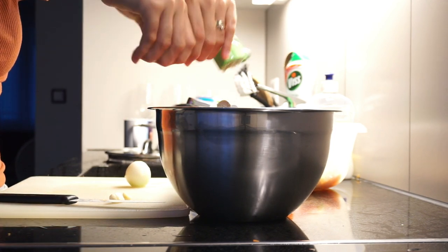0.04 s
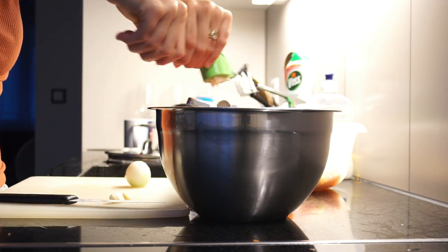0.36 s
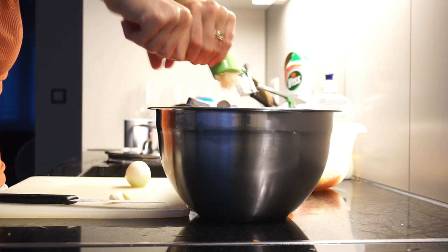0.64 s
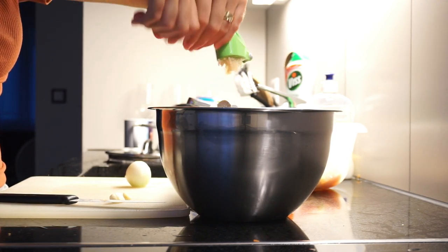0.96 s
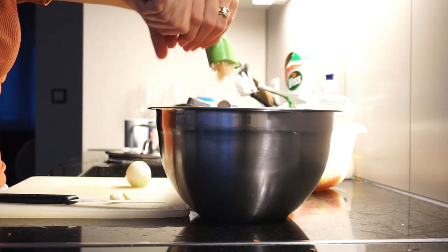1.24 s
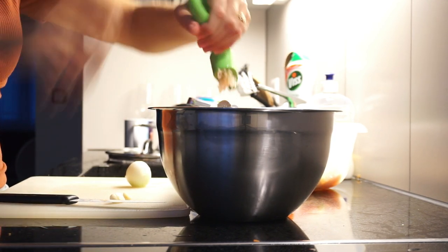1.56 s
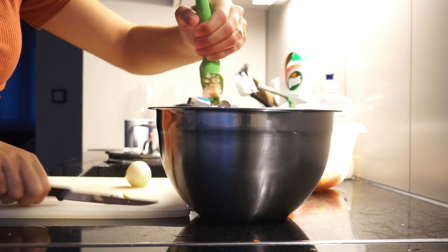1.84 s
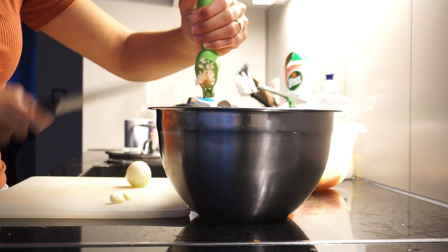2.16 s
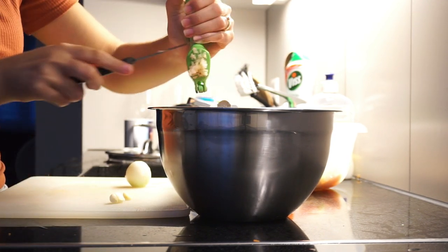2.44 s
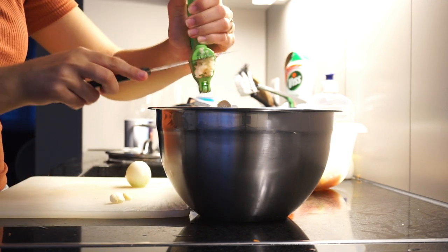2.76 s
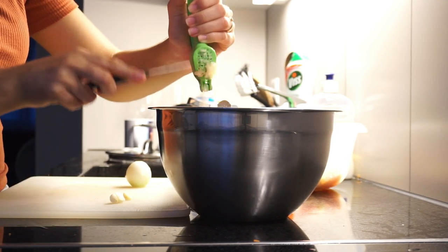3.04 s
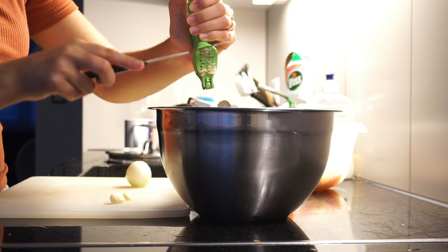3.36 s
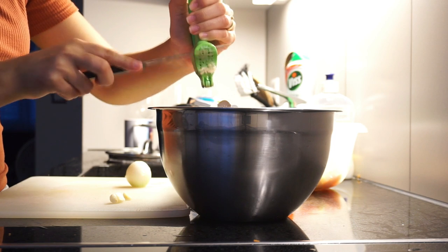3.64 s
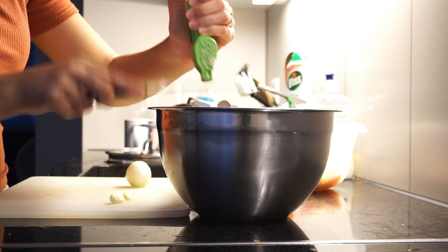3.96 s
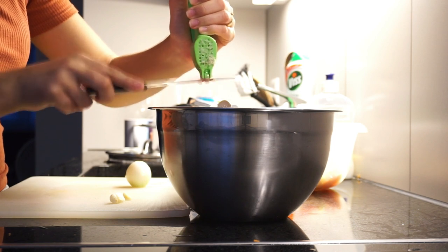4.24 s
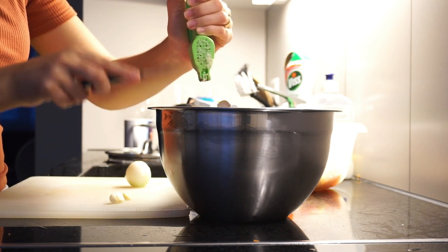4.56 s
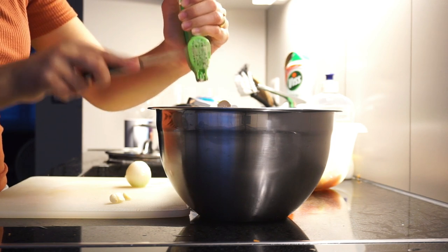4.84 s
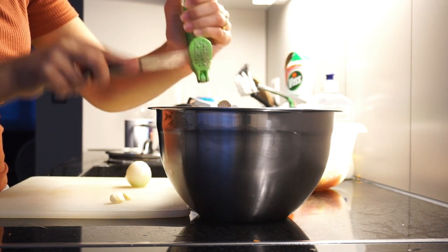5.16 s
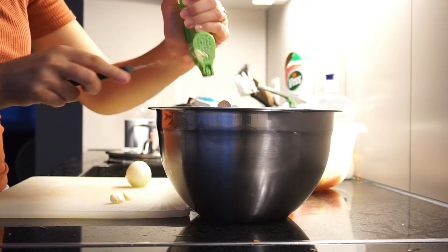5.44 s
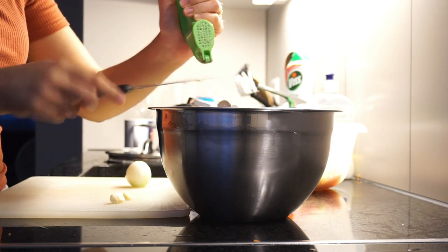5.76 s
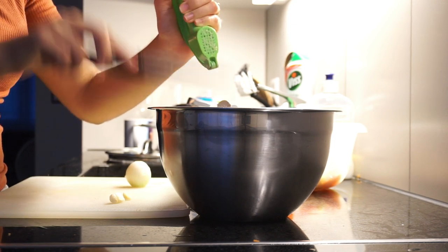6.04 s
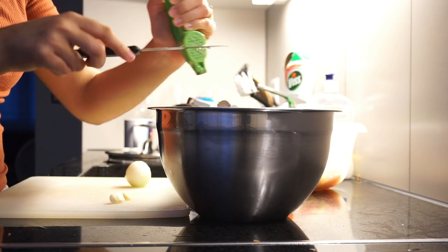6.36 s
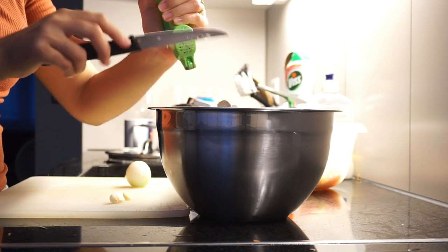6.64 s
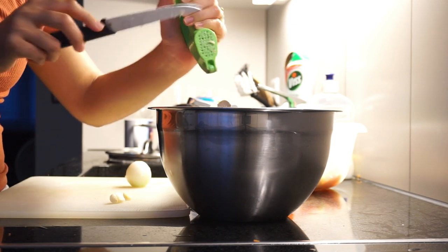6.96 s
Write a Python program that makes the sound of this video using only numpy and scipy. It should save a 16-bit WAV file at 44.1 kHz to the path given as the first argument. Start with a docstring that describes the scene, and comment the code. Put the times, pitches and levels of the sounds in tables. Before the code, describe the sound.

In a softly hissing kitchen, a garlic press gives a brief wet crackle close to the microphone. An arm rustles faintly and a knife is picked up from a board with small knocks. The blade scrapes the press in uneven, bright clicks and duller plastic clacks, with one faint low rumble among them. Then a steel bowl is struck and rings, and the blade squeaks thinly, clicks and scrapes once more.

```python
"""First comes a wet crackle: garlic spits through the holes of a hand press over a steel bowl in a kitchen.
An arm rustles, and a knife knocks on the board as it is picked up. Its edge clicks and scrapes over the
press, making the blade and the press's plastic body ring briefly. After a short low rumble, the knife hits
the bowl once; the long ring throbs because the steel's tones come in close pairs. Last, the blade sticks
and slips on the press with a thin squeak. A soft hiss lies under it all."""
import sys
import numpy as np
from scipy import signal
from scipy.fft import rfft, irfft
from scipy.io import wavfile
from scipy.ndimage import uniform_filter1d

SR = 44100
rng = np.random.default_rng(int(sys.argv[2]) if len(sys.argv) > 2 else 0)


def materialize(psi):
    """Save the field psi as 16-bit PCM at rate SR to the path in sys.argv[1].

    A 1-D psi becomes a single channel; in a 2-D psi each row is a channel.
    """
    bounded = np.clip(np.atleast_2d(psi).T, -1, 1)
    quanta = np.round(bounded * 32767).astype(np.int16)
    wavfile.write(sys.argv[1], SR, quanta)


N = 317961
TIME = np.arange(N) / SR

# The kitchen's echo. Each row: frequency in Hz, seconds to fade by 60 dB.
ECHO_FADES = [(200, 0.24), (1500, 0.95), (5000, 0.59), (11000, 0.42)]
# The tone of the room's noise. Each row: frequency in Hz, level in dB.
HISS_SPECTRUM = [(15, -74), (25, -56), (64, -54), (87, -10.5), (118, -16), (134, -8.5), (191, -2.5),
                 (229, -7), (491, -1.5), (617, -4.5), (928, -3), (1940, -6), (2840, -10.5), (3310, -10),
                 (11000, -14), (14200, -108), (22000, -120)]
# How alike that noise is left and right. Each row: frequency in Hz, likeness from -1 (opposite) to 1 (same).
HISS_LIKENESS = [(60, 0.64), (140, 0.9), (340, 0.000083), (790, -0.52), (1880, -0.41), (4440, -0.15),
                 (10500, 0.078)]
# Squeezes. Each row: peak time in seconds, level in dB, fall in seconds, the press's ring in relative dB.
GARLIC_SQUEEZES = [(.19, -41, 0.014, -19), (.243, -27, 0.021, -22), (.375, -43, .015, -25),
                   (.461, -25.5, 0.016, -16), (0.678, -27.5, .0075, -6.5)]
# Air pockets bursting through the holes. Each row: peak time in seconds, level in dB.
AIR_POPS = [(0.2173, -22), (0.4864, -25)]
# The tone of the spitting pulp. Each row: frequency in Hz, level in dB.
PULP_SPECTRUM = [(180, -58), (300, -21), (464, -18), (609, -26), (1220, -14), (1750, -21), (2510, -11),
                 (4180, -6), (4510, -4.5), (5480, -2.5), (7980, -3.5), (8870, 0), (11000, -0.5),
                 (14200, -33), (22000, -120)]
# Arm movements. Each row: peak time in seconds, level in dB, rise and fall time in seconds.
ARM_RUSTLES = [(1.45, -55.5, 0.058), (2.42, -58.5, 0.18), (5.78, -50, 0.087)]
# The tone of the rustle. Each row: frequency in Hz, level in dB.
RUSTLE_SPECTRUM = [(200, -1), (600, 14), (1300, 18.5), (2500, -1), (5000, -53), (11000, -57)]
# The knife knocking on the board. Each row: peak time in seconds, level in dB.
KNIFE_KNOCKS = [(1.733, -43.5), (1.807, -45), (1.839, -37), (1.863, -30), (1.883, -31), (1.899, -27),
                (1.933, -36.5)]
# The tone of the board. Each row: frequency in Hz, level in dB.
BOARD_SPECTRUM = [(300, -9), (700, -19), (980, 1), (1250, -10), (1600, -4.5), (2400, 0), (3100, -8.5),
                  (3900, -5.5), (6600, -14), (7500, -20), (11000, -25)]
# Sharp clicks of the blade. Each row: start in seconds, level in dB, drag in relative dB, ping pitch in Hz.
BLADE_CLICKS = [(2.687, -38.5, -14, 5300), (2.9186, -29.5, -12.5, 4780), (3.1701, -32, -7.5, 5310),
                (3.4311, -28, -4.5, 5390), (3.469, -23, -7.5, 5435), (3.687, -9, -19, 5450),
                (3.9314, -8, -23.5, 5410), (4.4147, -8, -25, 5540), (4.7466, -34.5, -13, 5340),
                (4.9306, -10.5, -14.5, 5460), (5.1811, -8, -19.5, 5520), (7.1316, -16, -4, 6950)]
# Duller drops onto the plastic body. Each row: start in seconds, level in dB, the drag's fall in seconds.
BODY_CLACKS = [(2.968, -33, 0.0086), (3.198, -37.5, 0.015), (3.9861, -18.5, 0.01), (4.2419, -19, 0.011),
               (4.4553, -29, 0.011), (4.4779, -26, 0.02), (4.7744, -43, .008), (4.9844, -20.5, 0.032),
               (5.215, -23.5, 0.042)]
# Resonances of the blade held on the press. Each row: frequency in Hz, width in Hz, level in dB.
PRESS_RESONANCES = [(1275, 92, -30), (2540, 550, -22), (3245, 150, -20.5), (3695, 360, -12),
                    (4680, 140, -27), (5290, 970, -4.5), (6190, 200, -11.5), (7260, 1800, -20.5),
                    (8300, 580, -8), (10300, 340, -24)]
# A hollow note that rises and weakens as the held length of the blade changes. Each row: time in seconds, pitch
# in Hz, level in dB.
HOLLOW_NOTE = [(3.2, 1566, -12.5), (3.47, 1640, -15), (3.69, 1880, -22.5), (5.2, 2004, -21)]
# The blade sliding. Each row: peak time in seconds, level in dB, rise in seconds, fall in seconds.
BLADE_SLIDES = [(2.963, -39.5, .012, 0.0068), (4.742, -46, .012, 0.018), (6.868, -45, 0.038, .018),
                (6.912, -38, .016, .012), (7.19, -34.5, 0.022, 0.057)]
# The tone of the sliding. Each row: frequency in Hz, level in dB.
SLIDE_SPECTRUM = [(590, -59), (1000, -50), (1420, -44), (1770, -17), (2160, -16), (2440, -9.5), (3530, -10),
                  (6000, -4.5), (11000, -8.5), (14200, -41), (22000, -120)]
# How the rumble's loudness moves. Each row: time in seconds, level in dB.
RUMBLE_LEVELS = [(4.26, -56), (4.282, -47), (4.306, -41), (4.416, -46.5), (4.43, -48)]
# The tone of the rumble. Each row: frequency in Hz, level in dB.
RUMBLE_SPECTRUM = [(40, -35), (90, -7), (140, 7.5), (260, 2.5), (500, 6), (700, -9), (1200, -49),
                   (4000, -68)]
# The tone of the bowl's clatter. Each row: frequency in Hz, level in dB.
BOWL_SPECTRUM = [(170, -20), (300, -19.5), (470, -7.5), (800, -2.5), (1600, -10), (2300, 0), (3100, -9.5),
                 (3550, -5), (3800, -22), (4200, -19), (4900, -4.5), (6200, -6.5), (6900, -9.5),
                 (11000, -19.5)]
# The steel's pairs of tones. Each row: pitch in Hz, level in dB, seconds to fade by 60 dB, gap to twin in Hz.
STEEL_TONES = [(1925, -29, .4, 14), (2130, -29, .45, 8), (2182, -26, .55, 9), (2248, -25, 1.0, 1.2),
               (2452, -28, .62, 6), (2828, -21, .5, 19), (3451, -24.5, .58, 16), (3550, -29, .5, 9),
               (4422, -18.5, 1.05, 1.3), (4747, -27, .8, 4), (4896, -17, 1.2, 3.15), (5053, -20, .52, 7),
               (5322, -23, .85, 2.5), (5724, -15, .43, 9), (6086, -20, .56, 4), (6446, -31, .4, 9),
               (6806, -36, .6, 6), (7168, -35, .45, 8), (7533, -26.5, .42, 5), (7831, -39, .55, 7),
               (9272, -40, .45, 10)]
# The squeak's short chirps. Each row: peak time in seconds, pitch in Hz, level in dB,
# half length in seconds, glide in Hz per second.
SQUEAK_CHIRPS = [(6.846, 8620, -32, .011, -1500), (6.84, 5090, -45, 0.013, 9001),
                 (6.858, 4300, -52, 0.013, -3000), (6.877, 9050, -41, .008, 8001),
                 (6.88, 5630, -46, 0.024, 5000.5), (6.891, 7800, -39, .009, -18000),
                 (6.906, 4650, -46, .011, -10000), (6.918, 5950, -46, 0.013, 1998.5)]


def from_db(db):
    """Turn decibels into a number to multiply by."""
    return 10 ** (np.asarray(db) / 20)


def rms_one(x):
    """Scale a signal so its average strength (rms) is 1."""
    return x / np.sqrt(np.mean(x ** 2) + 1e-20)


def at_hz(points, hz):
    """Read between a table's rows, with octaves evenly spaced."""
    f, value = np.transpose(points)
    return np.interp(np.log(np.maximum(hz, 1)), np.log(f), value)


def colour(x, spectrum, top_hz=11600):
    """Give a signal the tone in a table, falling away below the first row; strength 1."""
    hz = np.arange(N // 2 + 1) * SR / N
    ends = np.minimum(hz / spectrum[0][0], 1) ** 2 * (hz < top_hz)
    return rms_one(irfft(rfft(x) * from_db(at_hz(spectrum, hz)) * ends, N))


def resonate(x, hz, width):
    """Make a signal ring near one pitch, longer when the width is narrow; strength 1."""
    r = np.exp(-np.pi * width / SR)
    return rms_one(signal.lfilter([1, 0, -1], [1, -2 * r * np.cos(2 * np.pi * hz / SR), r * r], x))


def cut_bass(x, hz, order=3):
    """Weaken everything below a frequency."""
    return signal.sosfilt(signal.butter(order, hz, "high", fs=SR, output="sos"), x)


def grains(per_s, spread_db, size=N):
    """Tiny clicks of uneven size at random moments; strength 1."""
    sizes = from_db(spread_db * np.minimum(rng.exponential(1, size), 4))
    return rms_one(sizes * rng.choice([-1, 1], size) * (rng.random(size) < per_s / SR))


def swells(rows):
    """A loudness curve that rises to a peak and falls again for each row."""
    power = np.zeros(N)
    for s, db, rise, fall in rows:
        fade = np.maximum((s - TIME) / rise, (TIME - s) / fall)
        power += from_db(db) ** 2 * np.exp(-2 * np.minimum(fade, 20))
    return np.sqrt(power)


def strokes(rows, spectrum, per_s, spread_db):
    """Many tiny contacts swell and fade, taking on the tone of the thing they touch."""
    sound = swells(rows) * colour(grains(per_s, spread_db), spectrum)
    return cut_bass(sound, 1.5 * spectrum[0][0])


def place(x, left_db):
    """Make a sound louder on the left; the right side leads by two samples."""
    return np.array([np.roll(x, 2) * from_db(left_db / 2), x * from_db(-left_db / 2)])


def kitchen(x, left_db, early_db, tail_db, early_s, lean=0.75):
    """The direct sound, quick echoes from counter, wall and cupboards, then the room's fading tail."""
    t = np.arange(SR) / SR
    edges = np.geomspace(100, 12800, 8)
    tail = 0
    for low, high in zip(edges, edges[1:]):
        band_filter = signal.butter(2, [low, high], "band", fs=SR, output="sos")
        band = signal.sosfilt(band_filter, rng.standard_normal((2, SR)))
        tail = tail + band * from_db(-60 * t / at_hz(ECHO_FADES, np.sqrt(low * high)))
    tail = from_db(tail_db) * rms_one(tail * (t > .008))
    early = rng.standard_normal((2, SR)) * (rng.random((2, SR)) < .1) * np.exp(-t / early_s)
    early = from_db(early_db) * rms_one(early * (t > .002))
    echoes = signal.fftconvolve(x[None], (early + tail) / np.sqrt(SR), axes=1)[:, :N]
    # the echoes lean to the source's side, less than the direct sound
    return place(x, left_db) + echoes * from_db(np.array([[1], [-1]]) * lean * left_db / 2)


def background():
    """Steady room noise and hiss, alike on both sides only in the bass."""
    hz = np.arange(N // 2 + 1) * SR / N
    alike = np.clip(at_hz(HISS_LIKENESS, hz), -.99, .99)
    mid, side = (rfft(colour(rng.standard_normal(N), HISS_SPECTRUM)) for _ in range(2))
    side = side * np.sqrt((1 - alike) / (1 + alike))
    return from_db(-52) * irfft([mid + side, mid - side], N) * from_db([[0.92], [-0.92]])


def pulp(rise_s=0.02, pop_rise_s=0.0013, pop_fall_s=0.0059):
    """Juice and air crackle through the holes; the press rings along, more freely as it empties."""
    crackle = grains(per_s=5000, spread_db=4.0)
    flow = swells([(s, db, rise_s, fall) for s, db, fall, _ in GARLIC_SQUEEZES])
    ringing = swells([(s, db + ring_db, rise_s, fall) for s, db, fall, ring_db in GARLIC_SQUEEZES])
    pops = swells([(s, db, pop_rise_s, pop_fall_s) for s, db in AIR_POPS])
    ring = ringing * resonate(crackle, hz=5340, width=410)
    knock = pops * from_db(-8) * resonate(crackle, hz=3470, width=2700)  # each pop knocks the plastic body
    return np.hypot(flow, pops) * colour(crackle, PULP_SPECTRUM) + ring + knock


def arm_rustle():
    """The moving arm rustles softly."""
    moves = [(s, db, length, length) for s, db, length in ARM_RUSTLES]
    return strokes(moves, RUSTLE_SPECTRUM, per_s=4000, spread_db=3.5)


def board_knocks(rise_s=0.002, fall_s=0.01):
    """The knife knocks on the board as it is picked up."""
    knocks = [(s, db, rise_s, fall_s) for s, db in KNIFE_KNOCKS]
    return strokes(knocks, BOARD_SPECTRUM, per_s=3500, spread_db=4.0)


def blade_contacts(mid_blade_hz=5435, firm_db=-10):
    """List the clicks, then the clacks, with the settings that blade_catches needs for each."""
    rows = []
    for s, db, drag_db, ping_hz in BLADE_CLICKS:
        # a lighter click has more plastic body in it; nearer the tip the ping is higher, the body weaker
        body_db = -4 + 0.45 * (firm_db - db) - 0.0092 * (ping_hz - mid_blade_hz)
        top_db, fall, ping_db = -6, 0.025, -2
        rows.append((s, db, body_db, top_db, drag_db, fall, ping_hz, ping_db))
    body_db, top_db, drag_db, ping_hz, ping_db = 8, -3.5, -6.5, 3580, -7
    for s, db, fall in BODY_CLACKS:
        rows.append((s, db, body_db, top_db, drag_db, fall, ping_hz, ping_db))
    return rows


def blade_catches(snap_s=0.0012, crack_db=-17, ping_width_hz=300, shift=0.0064, size=8192):
    """The edge snaps over a ridge, then drags on; gives the press's clacks and the blade's pings."""
    clacks, pings = np.zeros((2, N + size))
    t = np.arange(size) / SR
    snap = t / snap_s * np.exp(1 - t / snap_s) * np.exp(-(t / (2 * snap_s)) ** 2)
    # the ping builds up during the snap and dies just after it
    ping_shape = signal.lfilter([1], [1, -np.exp(-np.pi * ping_width_hz / SR)], snap)
    hollow_s, hollow_hz, hollow_db = np.transpose(HOLLOW_NOTE)
    for s, db, body_db, top_db, drag_db, fall, ping_hz, ping_db in blade_contacts():
        force = snap + from_db(drag_db) * np.exp(-t / fall)
        contact = force * grains(per_s=12000, spread_db=0.66, size=size)
        clack = from_db(crack_db) * rms_one(contact)
        hollow = resonate(contact, np.interp(s, hollow_s, hollow_hz), width=100)
        hollow *= from_db(np.interp(s, hollow_s, hollow_db) + body_db)
        for hz, width, tone_db in PRESS_RESONANCES:
            # the spot touched shifts each pitch a little and favours the plastic body or the thin edge
            shifted_hz = hz * (1 + shift * rng.uniform(-1.2, 1))
            contact_db = at_hz([(3700, body_db), (5000, 0), (6300, 0), (8500, top_db)], hz)
            clack += from_db(tone_db + contact_db) * resonate(contact, shifted_hz, width)
        ping = from_db(ping_db) * rms_one(ping_shape * np.sin(2 * np.pi * ping_hz * t))
        start = int(s * SR)
        strength = from_db(db) * np.sqrt(np.mean(force ** 2))
        clacks[start:start + size] += strength * clack
        pings[start:start + size] += strength * (hollow + ping)
    return cut_bass([clacks[:N], pings[:N]], hz=900)  # such small things give off no bass


def blade_slides():
    """The blade scrapes along the press in short strokes."""
    return strokes(BLADE_SLIDES, SLIDE_SPECTRUM, per_s=7000, spread_db=2.5)


def rumble():
    """A brief swell of low noise."""
    level_db = np.interp(TIME, *np.transpose(RUMBLE_LEVELS), left=-np.inf, right=-np.inf)
    return from_db(level_db) * colour(rng.standard_normal(N), RUMBLE_SPECTRUM)


def bowl_clatter(strike_s, rise_s=0.00056):
    """The knife hits the bowl; the contents rattle and settle."""
    blow = (strike_s, -10.5, rise_s, .012)  # peak time in seconds, level in dB, rise and fall in seconds
    rattle = (strike_s + 0.071, -23, 0.023, 0.062)
    clatter = strokes([blow, rattle], BOWL_SPECTRUM, per_s=13000, spread_db=2.0)
    return clatter * (TIME > strike_s - 2 * rise_s)


def steel_ring(strike_s, left_db=1.5, right_db=-4.5, contact_s=0.0017):
    """Each tone builds up during the hit and throbs against its twin, out of step left and right."""
    start = int(strike_s * SR)
    t, out = TIME[:N - start], np.zeros((2, N))
    for hz, db, fade_s, gap_hz in STEEL_TONES:
        phase = 2 * np.pi * (hz * t + rng.random())
        twin = phase + 2 * np.pi * gap_hz * t
        fade = from_db(db - 60 * t / fade_s) * (1 - np.exp(-t / contact_s))
        out[0, start:] += from_db(left_db) * fade * (np.sin(phase) - np.sin(twin))
        out[1, start:] += from_db(right_db) * fade * (np.sin(phase) + 0.76 * np.cos(twin))
    return out


def squeak(waver_hz=110, rough=0.31):
    """The edge sticks and slips, making thin gliding tones that waver in pitch and strength."""
    out = np.zeros(N)
    for s, hz, db, length, glide in SQUEAK_CHIRPS:
        waver, grip = (rms_one(uniform_filter1d(rng.standard_normal(N), size=90)) for _ in range(2))
        pitch = hz + glide * (TIME - s) + waver_hz * waver
        swell = from_db(db) * np.exp(-np.minimum(((TIME - s) / length) ** 2 / 2, 20))
        out += swell * rms_one((1 + rough * grip) * np.sin(2 * np.pi * np.cumsum(pitch) / SR))
    return out


def scene(strike_s=6.021):
    """Place all the sounds in the kitchen and add them up."""
    slides = blade_slides()
    handling = board_knocks() + bowl_clatter(strike_s) + arm_rustle()
    low = place(rumble(), left_db=4.0)
    ring = steel_ring(strike_s)
    clacks, pings = blade_catches()
    press = kitchen(clacks, left_db=6.5, early_db=-0.5, tail_db=-6.5, early_s=0.0043)
    # the flat of the blade faces the microphone, so its tones arrive with little echo
    blade = kitchen(from_db(2.5) * pings + squeak(), left_db=11, early_db=-7, tail_db=-16, early_s=0.032)
    squeezing = kitchen(pulp() + slides, left_db=6.5, early_db=6, tail_db=-4.0, early_s=0.0048)
    faint_ring = from_db(-24) * ring.mean(axis=0)
    counter = kitchen(handling + faint_ring, left_db=5.0, early_db=1, tail_db=-6.0, early_s=0.0075)
    return press + blade + squeezing + counter + ring + low + background()


def record(dry, mic_top_hz=11100, cutoff_hz=16300):
    """The recorder loses the highest treble and deepest bass; the sharpest clicks overload it."""
    narrow = signal.sosfilt(signal.ellip(14, .2, 80, mic_top_hz, fs=SR, output="sos"), dry)
    thin = cut_bass(np.clip(narrow, -1, 1), hz=70, order=1)
    return signal.sosfilt(signal.ellip(10, .2, 80, cutoff_hz, fs=SR, output="sos"), thin)


dry = scene()
out = record(dry)
materialize(out)
```